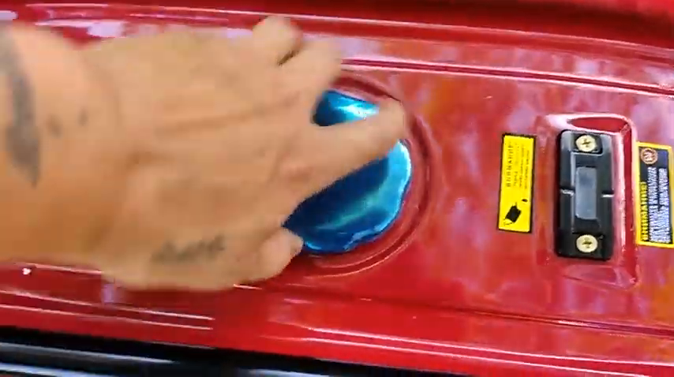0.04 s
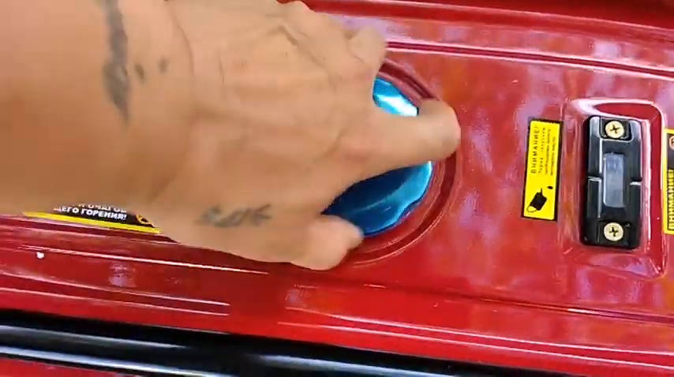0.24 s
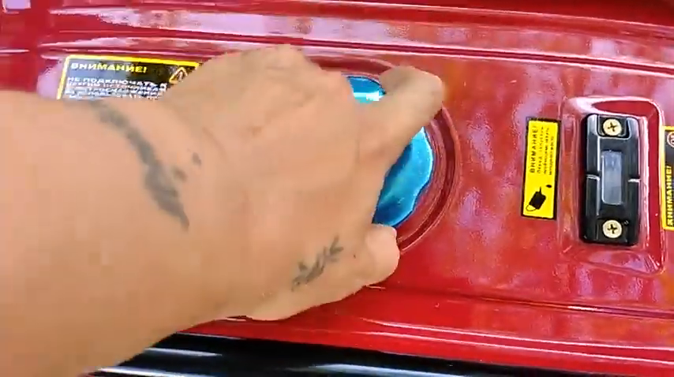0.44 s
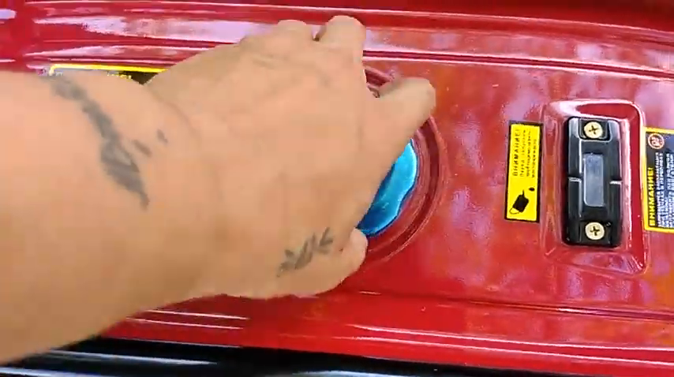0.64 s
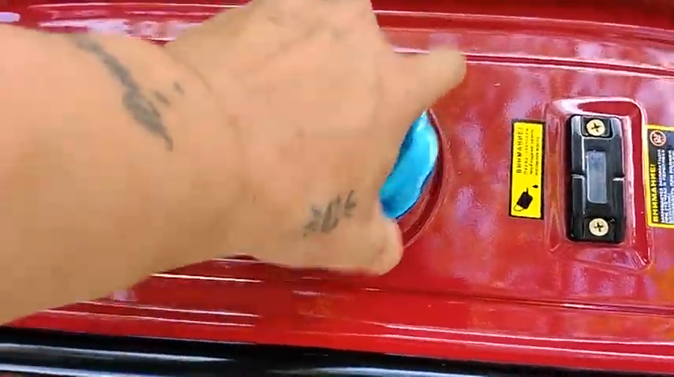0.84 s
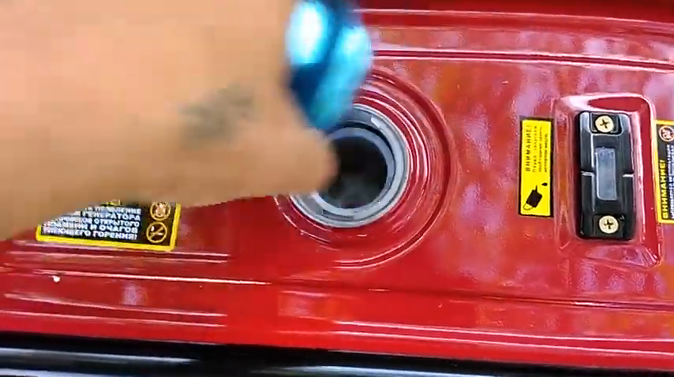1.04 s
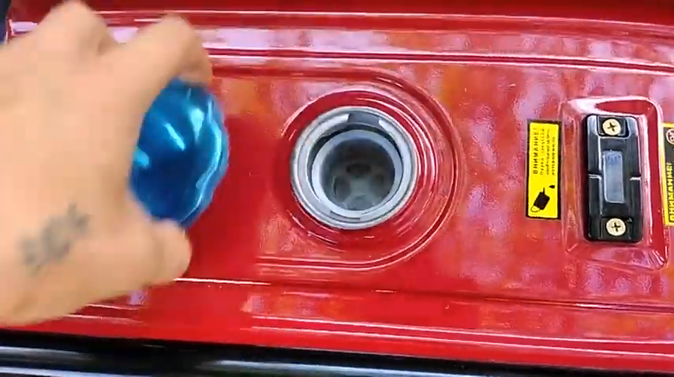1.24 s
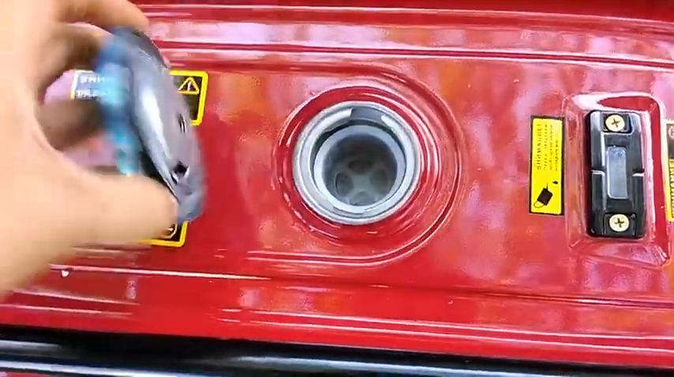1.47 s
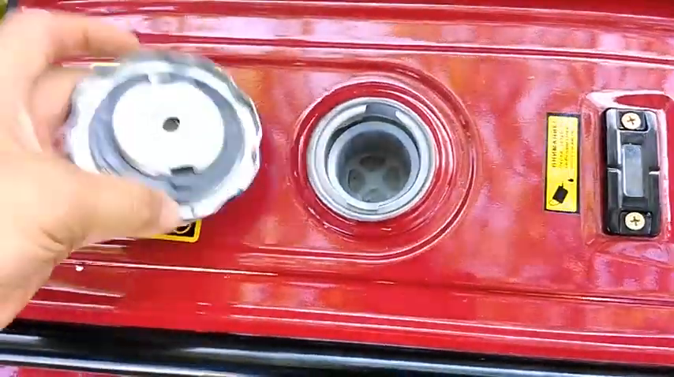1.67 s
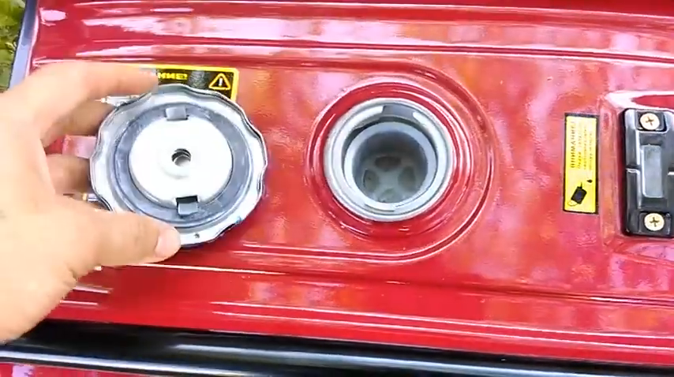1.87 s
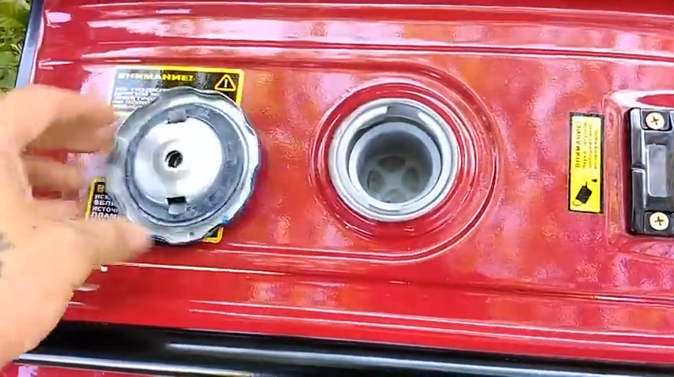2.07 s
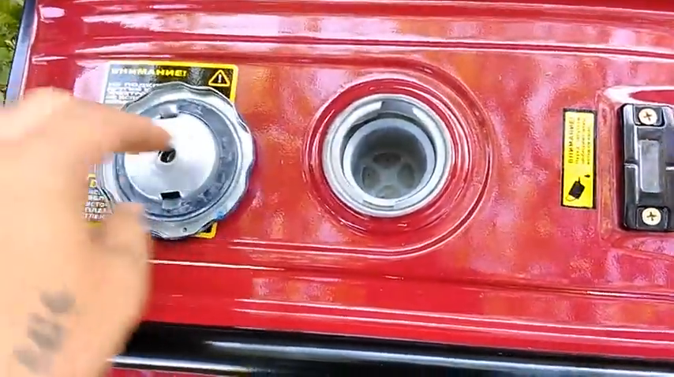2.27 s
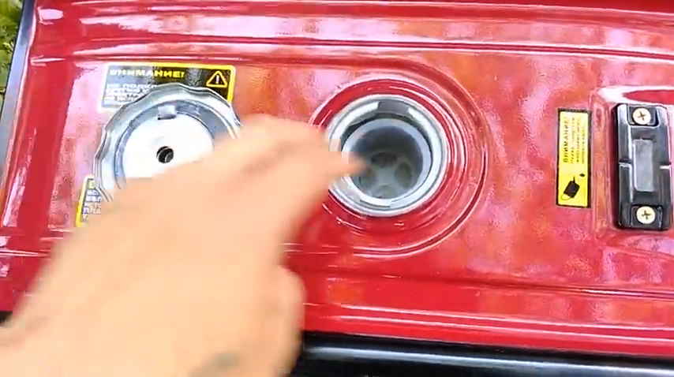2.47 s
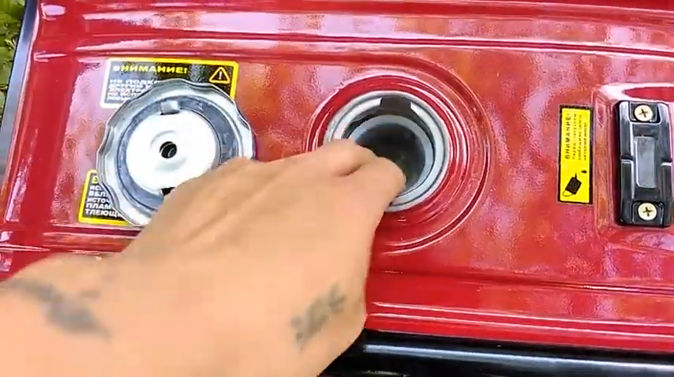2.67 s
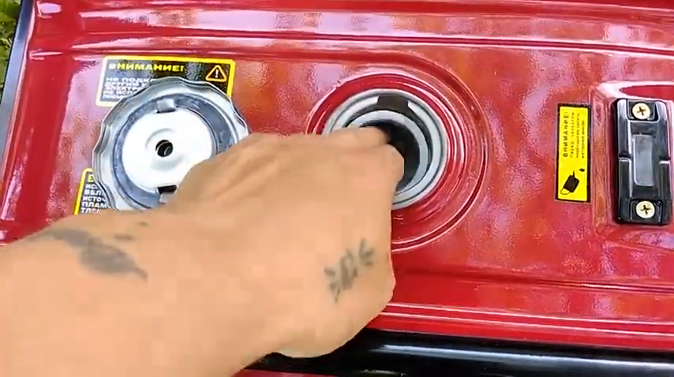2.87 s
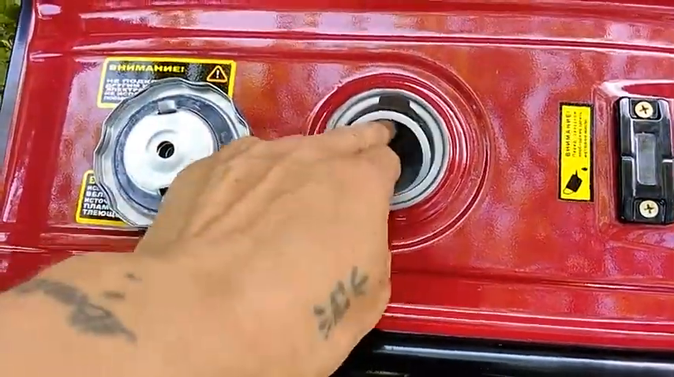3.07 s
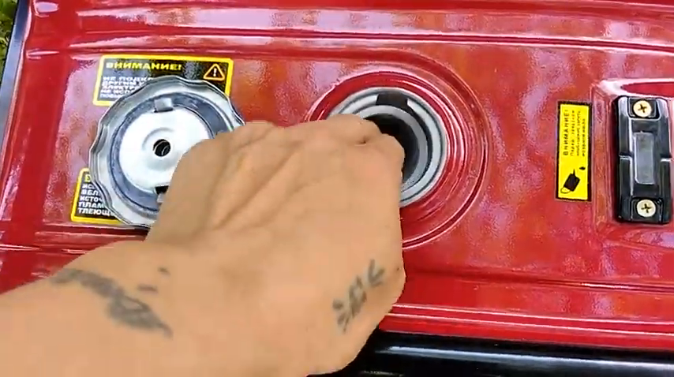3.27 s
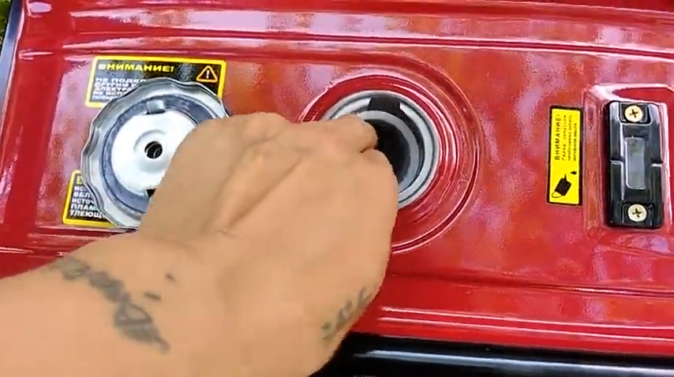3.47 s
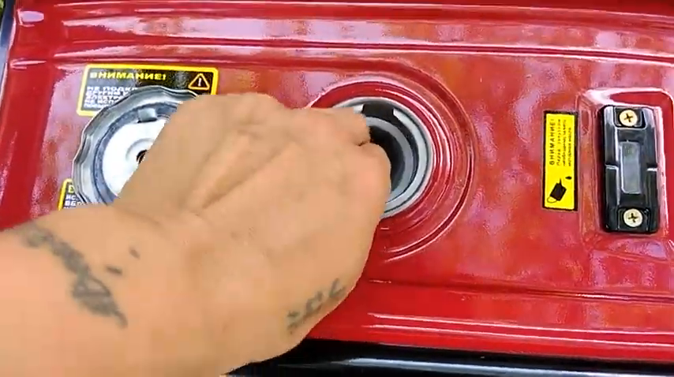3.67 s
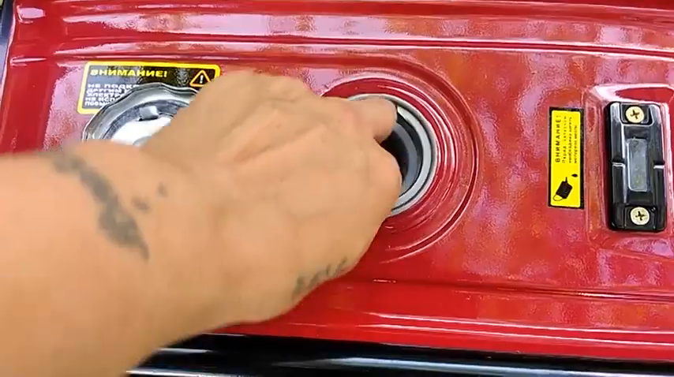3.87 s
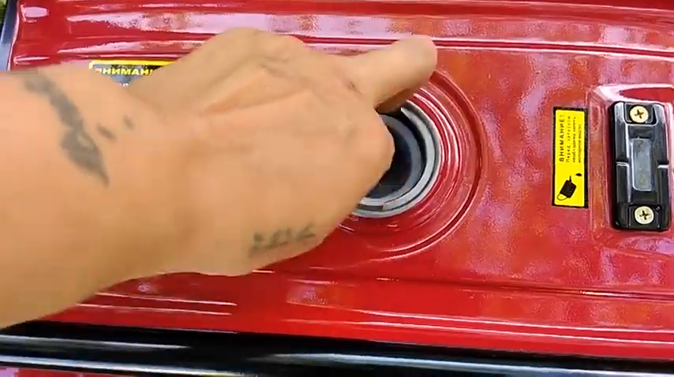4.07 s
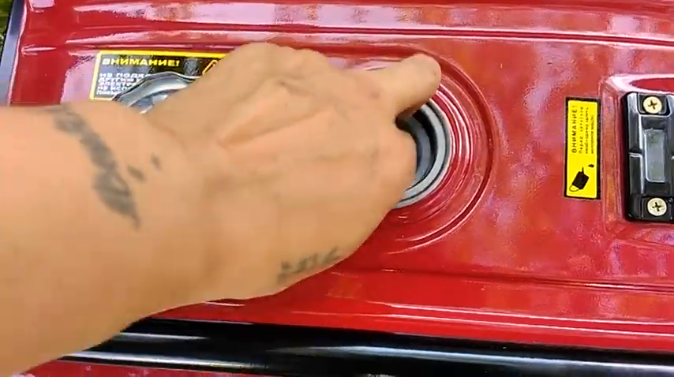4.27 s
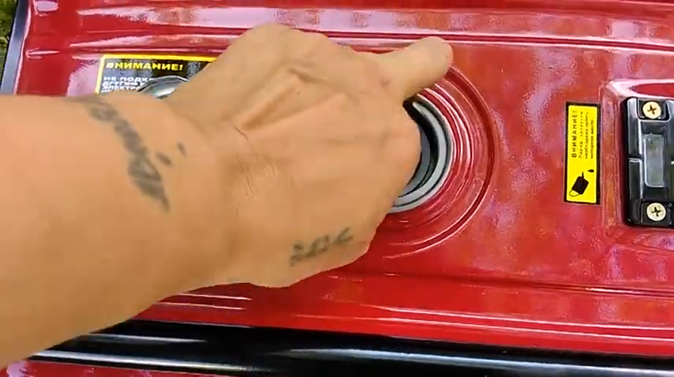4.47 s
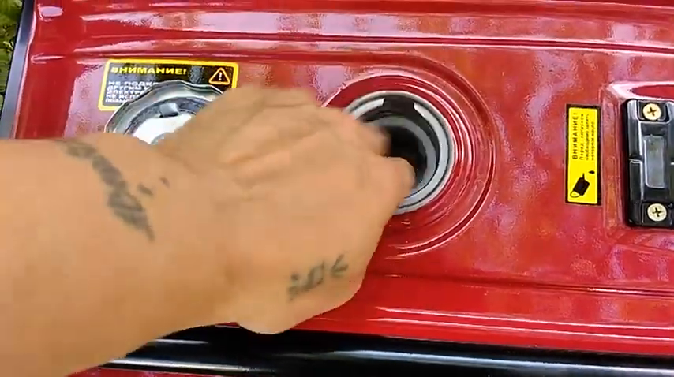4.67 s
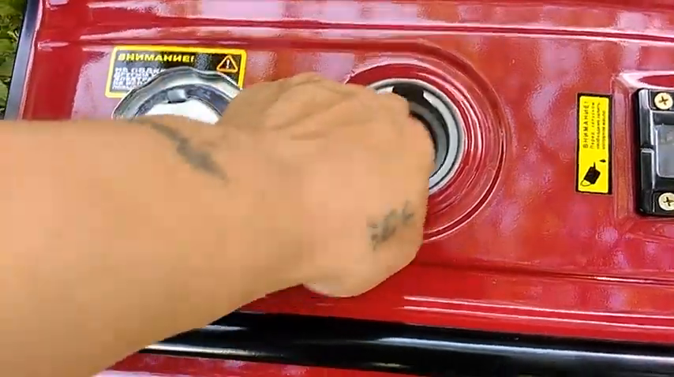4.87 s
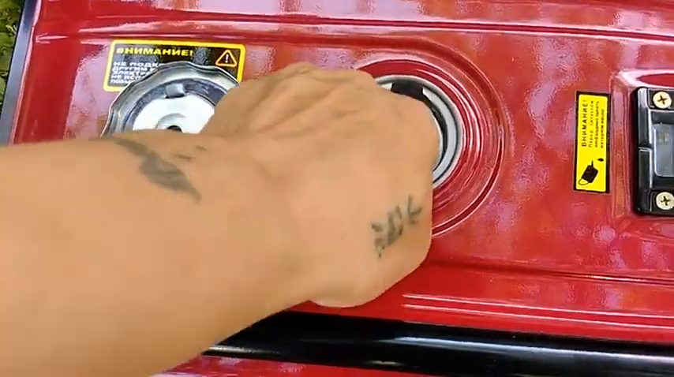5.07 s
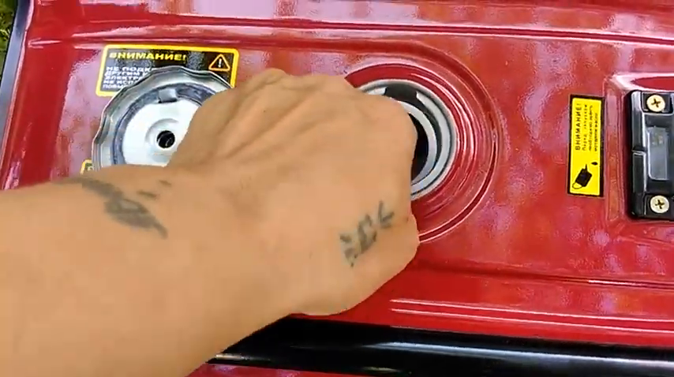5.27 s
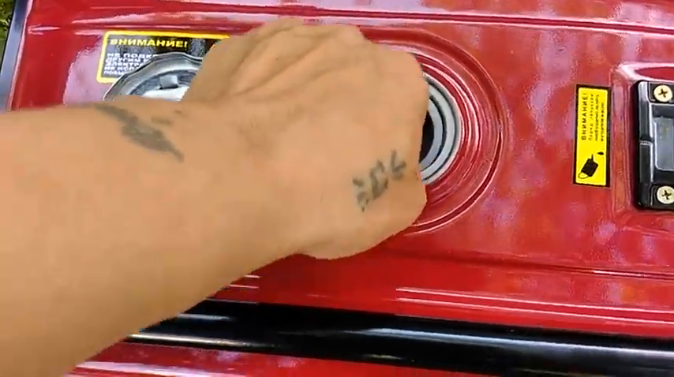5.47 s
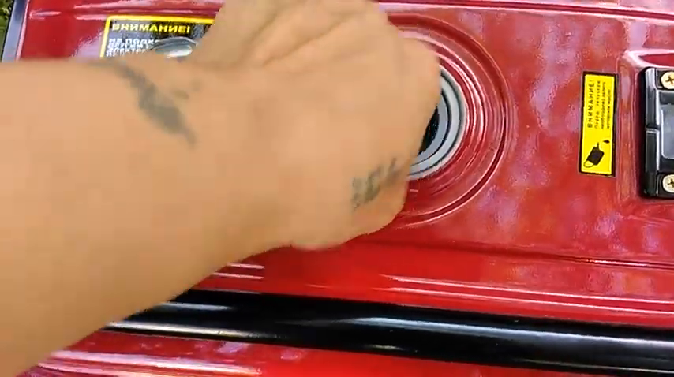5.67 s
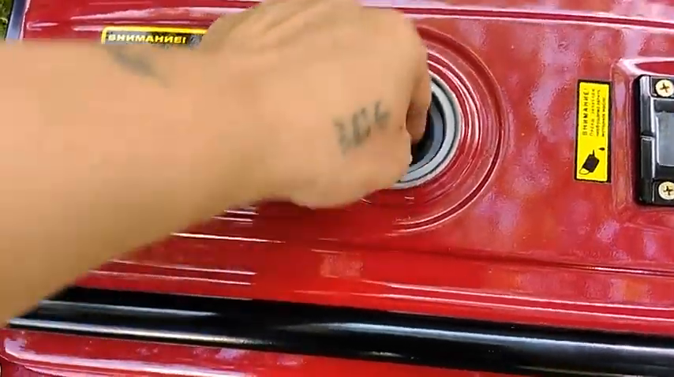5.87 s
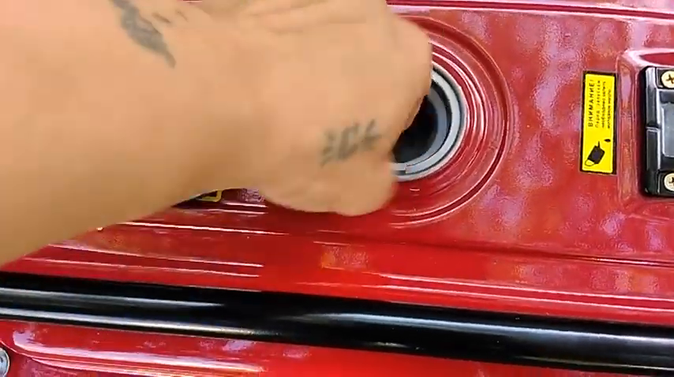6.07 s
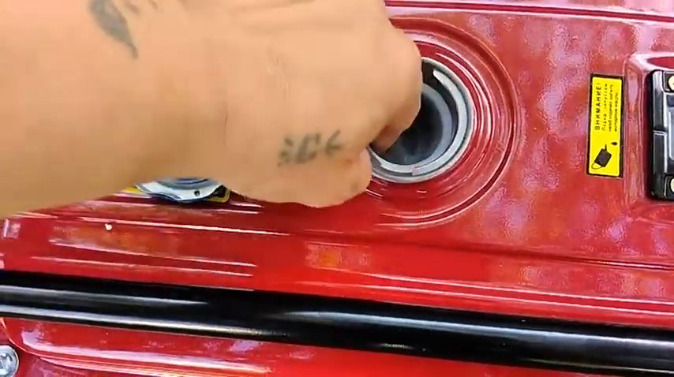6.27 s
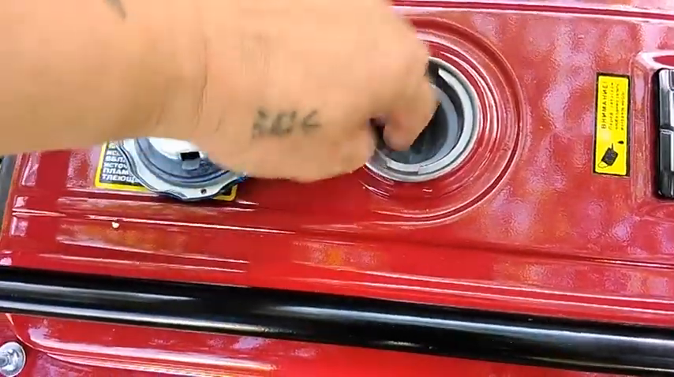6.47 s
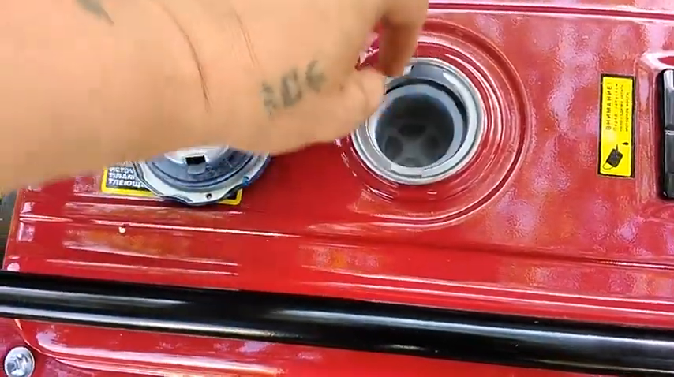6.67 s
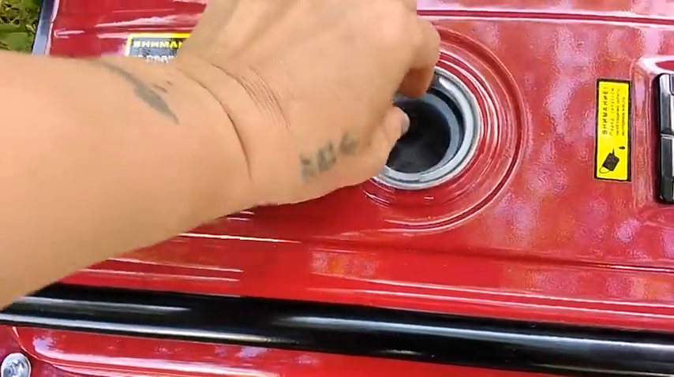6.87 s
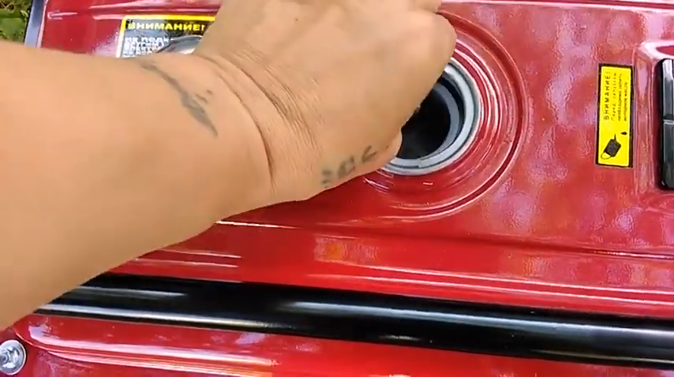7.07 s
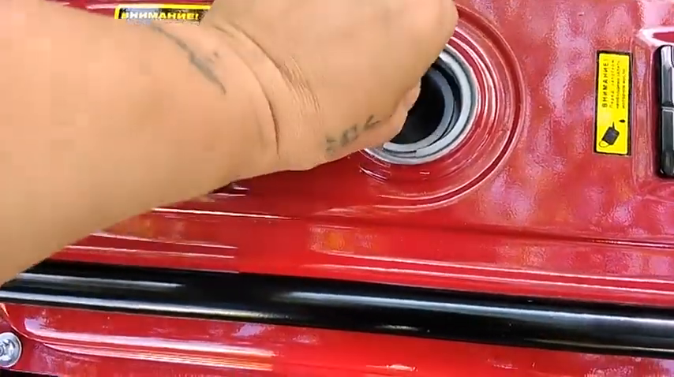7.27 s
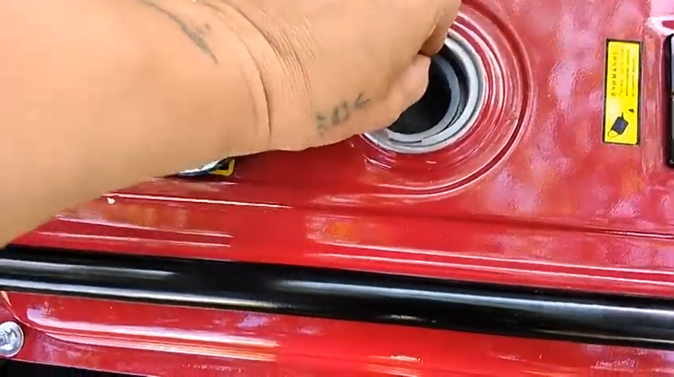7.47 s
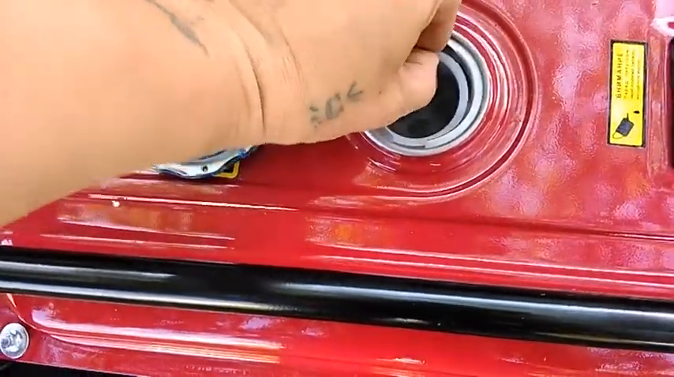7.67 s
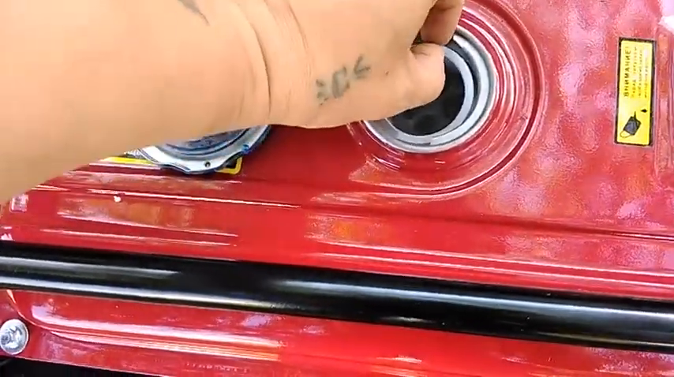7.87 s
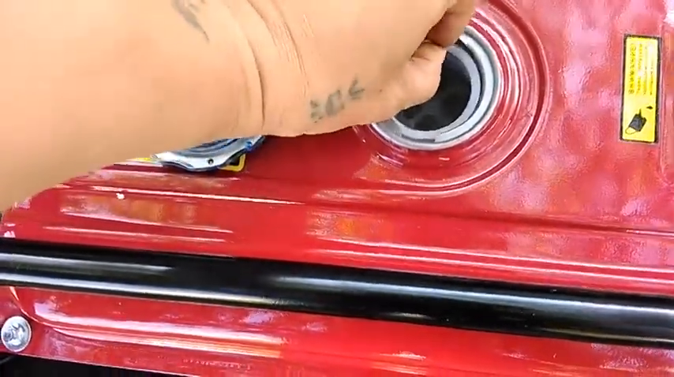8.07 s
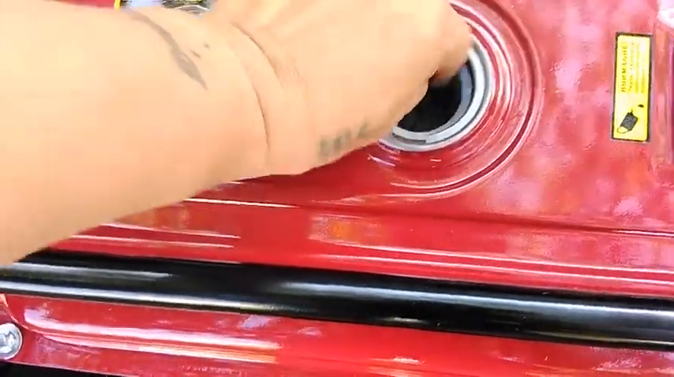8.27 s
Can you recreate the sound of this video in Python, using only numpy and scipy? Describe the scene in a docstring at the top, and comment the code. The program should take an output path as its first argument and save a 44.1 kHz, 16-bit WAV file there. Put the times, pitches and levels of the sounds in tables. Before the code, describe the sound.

Close metallic cap clicks, a small clink and two heavy hollow thuds, followed by irregular finger taps and rubbing on a sheet-metal tank outdoors.

```python
"""Outdoor quiet lies under a close take on a hollow sheet-steel tank. A cap's lugs scrape and snap out of the neck,
its loose locking plate clinks as it is turned over, then it lands on top and rocks to rest. Fingers rub and bump
the filler neck, and one faint insect swells toward the end. Knocks ring tank modes inside a crowd of weaker ones;
rubbing drives the same rings with random slips; air, skin hiss and insect are shaped noise."""
import sys
import numpy as np
from scipy import signal
from scipy.fft import rfft, irfft, next_fast_len
from scipy.io import wavfile
from scipy.ndimage import uniform_filter1d

SR = 44100
rng = np.random.default_rng(int(sys.argv[2]) if len(sys.argv) > 2 else 0)


def store_pcm(level_fs):
    """Save levels as 16-bit WAV."""
    pcm = np.round(np.clip(level_fs, -1, 1) * 32767).astype(np.int16)
    wavfile.write(sys.argv[1], SR, np.atleast_2d(pcm).T)


N = 367794
TIME = np.arange(N) / SR
RING = np.arange(int(0.6 * SR)) / SR  # time axis of one ring, s
ONSET = int(0.04 * SR)  # samples over which a ring's level is set


def amp(db):
    """Decibels to gain."""
    return 10 ** (np.asarray(db) / 20)


def evened(x, size=None):
    """Scales x so that its first size samples have rms 1."""
    return x / np.sqrt(np.mean(x[:size] ** 2) + 1e-20)


def decay(t60_s):
    """Exponential decay by 60 dB in t60_s."""
    return amp(-60 * RING / t60_s)


def ring_noise():
    """White noise as long as a ring."""
    return rng.standard_normal(len(RING))


def add(mix, start_s, sound):
    """Adds a sound to the mix from start_s on."""
    part = mix[max(round(start_s * SR), 0):][:len(sound)]
    part += sound[:len(part)]


def coloured(x, points, low_hz=10, high_hz=22000):
    """Gives x a spectrum of (Hz, dB) points between two soft band edges, at rms 1."""
    size = next_fast_len(len(x))
    hz = np.fft.rfftfreq(size, 1 / SR) + 1
    point_hz, point_db = np.transpose(points)
    band = 1 / np.sqrt((1 + (low_hz / hz) ** 16) * (1 + (hz / high_hz) ** 16))
    gain = amp(np.interp(np.log(hz), np.log(point_hz), point_db))
    return evened(irfft(rfft(x, size) * band * gain, size)[:len(x)])


def resonate(x, hz, width_hz):
    """A resonance that follows the curve hz: shift down to zero, smooth twice, shift back."""
    turn = np.exp(2j * np.pi * np.cumsum(hz) / SR)
    r = np.exp(-np.pi * width_hz / SR)
    smooth = signal.lfilter([1], [1, -2 * r, r * r], x / turn)
    return evened((turn * smooth).real)


def uneven(x, ripple_db, ripple_hz, lasts_s):
    """Narrow peaks and dips that come and go as the point of contact moves."""
    hz, t, z = signal.stft(x, SR, nperseg=512)
    field = rng.standard_normal(z.shape)
    for axis, span in enumerate((ripple_hz / hz[1], lasts_s / t[1])):
        size = max(round(span), 1)
        for _ in range(2):
            field = uniform_filter1d(field, size, axis, mode="wrap")
    gain = evened(amp(ripple_db * evened(field)))
    return signal.istft(z * gain, SR, nperseg=512)[1][:len(x)]


def wander(per_s):
    """Slow chance: a new random value per_s times a second, joined by straight lines."""
    return np.interp(TIME * per_s, np.arange(1000), rng.standard_normal(1000))


def grains(per_s, spread_db):
    """Tiny slips at random moments, a few much larger than the rest."""
    size = amp(spread_db * np.minimum(rng.exponential(1, N), 4))
    return evened(size * rng.choice([-1, 1], N) * (rng.random(N) < per_s / SR))


# Spectrum of still air. Each row: frequency in Hz, relative level in dB.
AIR_SPECTRUM = [(20, -26), (50, -3), (150, -4.5), (270, -7.5), (1000, -13.5), (3500, -15), (7300, -21.5),
                (8050, -15), (8900, -17), (15000, -27.5)]


def still_air(level_db=-87):
    """Quiet outdoor air: steady shaped noise."""
    return amp(level_db) * coloured(rng.standard_normal(N), AIR_SPECTRUM)


INSECT_REF_S, INSECT_REF_DB, INSECT_RISE_DB_PER_S = 8.4, -78, 12


def insect(chirr_hz=8050, skirt_hz=1300, pulse_hz=55.6, depth=0.28):
    """A faint insect: a narrow noise band that pulses and swells as it starts to sing."""
    spectrum = [(chirr_hz - skirt_hz, -36), (chirr_hz, 0), (chirr_hz + skirt_hz, -32)]
    chirr = coloured(rng.standard_normal(N), spectrum, low_hz=5020)
    pulses = evened(1 + depth * np.sin(2 * np.pi * pulse_hz * TIME))
    swell = amp(INSECT_REF_DB + INSECT_RISE_DB_PER_S * np.minimum(TIME - INSECT_REF_S, 0))
    return swell * chirr * pulses


# A fingertip or nail slips once. Each row: start in seconds, pitch in Hz, level in dB.
SLIP_TICKS = [(0.576, 4130, -63.5), (0.819, 5900, -48), (4.444, 5170, -64), (5.182, 3690, -73.5),
              (7.32, 1740, -69), (7.361, 1820, -65), (7.373, 1620, -71), (7.525, 2970, -70.5)]


def slip_ticks(t60_s=0.09, rise_s=0.00044, skirt_db=-34):
    """Single slips: short noise bursts in a narrow band around each tick's pitch."""
    out = np.zeros(N)
    for start_s, hz, db in SLIP_TICKS:
        spectrum = [(hz / 2, skirt_db), (hz, 0), (hz * 2, skirt_db)]
        burst = coloured(ring_noise(), spectrum, hz / 2, hz * 2)
        tick = burst * decay(t60_s) * (1 - np.exp(-RING / rise_s))
        add(out, start_s, amp(db) * evened(tick, ONSET))
    return out


# Modes of the locking plate. Each row: frequency in Hz, relative level in dB, t60 in seconds.
PLATE_MODES = [(782, -14.5, 0.122), (1512, -11.5, 0.11), (1700, -1, 0.12), (2240, -3.5, 0.16),
               (3630, -1, .11), (4200, -13.5, .12), (4800, -2, 0.044), (4760, -11, .07), (5780, 1.5, .07),
               (5870, -4, 0.098), (6100, -3.5, .07), (6650, -8, .08), (7100, -7, 0.049), (8480, -4.5, .05),
               (9350, -11, .06), (12840, -20, .05), (13640, -17.5, .04)]


def plate_ring(spot_db=1.5):
    """The small steel plate's dying sines, weighted by the spot that is hit."""
    hz, db, t60_s = np.transpose(PLATE_MODES)[:, :, None]
    weights = rng.choice([-1, 1], len(hz)) * amp(spot_db * rng.standard_normal(len(hz)))
    modes = amp(db) * decay(t60_s) * np.sin(2 * np.pi * hz * RING)
    return evened(weights @ modes, ONSET)


# Skin sliding on paint; also colours the plate's tick. Each row: frequency in Hz, relative level in dB.
SKIN_SPECTRUM = [(1200, -15), (3000, 0), (4800, -8), (5700, -4.5), (6600, -0.5), (8200, 1.5), (9300, -4.5),
                 (10200, -13), (13000, -20), (15500, -23)]
# The loose locking plate hits as the cap is turned over. Each row: start in seconds, level in dB.
CLINKS = [(1.588, -63.5), (1.604, -47.5), (1.649, -55)]
# The plate slides fastest just before it hits its stop.
SLIDE_PEAK_S, SLIDE_DB, SLIDE_RISE_DB_PER_S, SLIDE_FALL_DB_PER_S = 1.586, -62, 193, 151


def clinks(tick_db=-1, tick_t60_s=0.046):
    """The locking plate slides, singing faintly, and hits its stops with a sharp tick."""
    ring = plate_ring()
    since_s = TIME - SLIDE_PEAK_S
    speed = amp(SLIDE_DB + np.minimum(SLIDE_RISE_DB_PER_S * since_s, -SLIDE_FALL_DB_PER_S * since_s))
    slide = speed * grains(per_s=3700, spread_db=8.5)
    singing = signal.oaconvolve(slide, ring / np.linalg.norm(ring))[:N]
    out = uneven(singing, ripple_db=5.5, ripple_hz=299, lasts_s=0.025)
    for start_s, db in CLINKS:
        tick = coloured(ring_noise(), SKIN_SPECTRUM, low_hz=3720) * decay(tick_t60_s)
        clink = plate_ring() + amp(tick_db) * evened(tick, ONSET)
        add(out, start_s, amp(db) * evened(clink, ONSET))
    return out


# Registers of the tank: boom, body, clang, click. Each row: low edge in Hz, high edge in Hz, first t60 in seconds,
# late t60 in seconds, late share in dB, base level of the crowd of weak modes in dB.
REGISTERS = [(51.3, 200, 0.088, 0.6, -18, -5.5), (180, 950, 0.13, 0.45, -2, -7),
             (966, 3030, 0.16, 0.46, -9.5, 3.5), (2947.6, 26000, 0.028, 0.25, -9.5, 0)]
# Tank modes. Each row: frequency in Hz, relative level under a finger in dB, under the cap in dB, t60 in seconds.
TANK_MODES = [(70.7, -7.5, -14.5, 0.44), (117.2, -5, -4, 0.39), (154.5, 0.5, -7.5, 0.36),
              (221, -8, -3, 0.36), (261.7, 0.5, 0.5, 0.36), (269.6, 1.5, -2, 0.24),
              (311.5, -0.5, -9.5, 0.4), (396, -19.5, -8, 0.44), (480.4, -8, -50, 0.34),
              (509.5, -6, -27, 0.27), (600.5, -12, -4.5, 0.31), (631.4, -6, -6, 0.23),
              (709, -5.5, -17, 0.45), (732, -3.5, -12, 0.3), (759, -5.5, -25, 0.3),
              (838, -30.5, -24.5, 0.12), (861, -11.5, -14, 0.42), (894, -17.5, -15.5, 0.29),
              (958, -28, -16, 0.36), (1053, -31.5, -16, 0.68), (1171, -32, -8.5, 0.19),
              (1230, -12.5, -28, 0.21), (1321, -13.5, -14, 0.11), (1399, -19.5, -17.5, 0.46),
              (1460, -11, -37, 0.067), (1625, -22, -35.5, 0.24), (1684, -27.5, -23.5, 0.56),
              (1784, -27, -26.5, 0.38), (2943.8, -32, -22, 0.36)]


def mode_shapes(by_cap):
    """The tank's dying sines under the cap or under a finger, grouped by register."""
    hz, finger_db, cap_db, t60_s = np.transpose(TANK_MODES)[:, :, None]
    waves = amp(cap_db if by_cap else finger_db) * decay(t60_s) * np.sin(2 * np.pi * hz * RING)
    return [waves[(hz[:, 0] >= low) & (hz[:, 0] < high)] for low, high, *_ in REGISTERS]


# Spectrum of the crowd of weak modes. Each row: frequency in Hz, relative level in dB.
STEEL_SPECTRUM = [(60, -2), (300, -1.5), (800, 0), (1050, -5.5), (1400, -3), (1850, -7), (2400, -13.5),
                  (3100, -15.5), (4800, -16.5), (7000, -14.5), (9000, -22), (11000, -28), (13500, -32),
                  (15500, -32.5)]


def tank_ring(waves, register, dense_db, tilt_db_per_octave=0, spot_db=4.5, ripple_db=5.0):
    """One register's answer to a tap: strong modes in a crowd of weak ones, weighted by the spot hit."""
    low_hz, high_hz, first_t60_s, late_t60_s, late_db, crowd_db = register
    weights = amp(spot_db * rng.standard_normal(len(waves))) * rng.choice([-1, 1], len(waves))
    hz = np.geomspace(40, 16000, 220)
    steel_hz, steel_db = np.transpose(STEEL_SPECTRUM)
    db = np.interp(np.log(hz), np.log(steel_hz), steel_db) + ripple_db * rng.standard_normal(len(hz))
    db += tilt_db_per_octave * np.log2(np.clip(hz, 3000, 7000) / 3000)
    crowd = coloured(ring_noise(), np.c_[hz, db], low_hz, high_hz) * decay(late_t60_s)
    ring = evened(weights @ waves, ONSET) + amp(crowd_db + dense_db) * evened(crowd, ONSET)
    # the struck spot is loudest at first, until the motion has spread over the shell
    extra_decay = amp(-60 * RING * max(1 / first_t60_s - 1 / late_t60_s, 0))
    return ring * (extra_decay + amp(late_db))


# The cap or the skin slides over the tank. Each row: start in seconds, length in seconds, then relative levels of
# low shudder in dB, drag on the steel in dB, hiss in dB.
STROKES = [(0.0, 0.071, -61.5, -79, -70.5), (0.213, 0.11, -67, -72, -62), (0.42, 0.19, -60, -91, -65.5),
           (0.687, .22, -49, -49, -74), (1.414, 0.045, -78.5, -88, -75.5), (1.538, 0.083, -92, -83, -61.5),
           (1.673, 0.4, -80, -70, -73.5), (2.122, 0.19, -48.5, -47, -70.5), (2.373, 0.082, -51, -66.5, -89),
           (2.655, 0.11, -75, -89.5, -64.5), (2.777, 0.079, -82, -64, -73.5),
           (2.892, .16, -52.5, -51.5, -66.5), (3.196, 0.071, -74, -49, -67),
           (3.535, 0.073, -66.5, -62, -83.5), (3.795, 0.066, -44, -60, -62.5),
           (3.905, 0.3, -57, -65.5, -72.5), (4.147, .17, -56, -53.5, -70.5), (4.344, 0.11, -56, -56.5, -94),
           (4.422, 0.061, -51, -58, -65), (4.483, 0.084, -50, -42, -62.5), (4.635, 0.12, -60, -44, -63),
           (4.866, 0.14, -63, -56.5, -76), (5.001, 0.12, -55, -54.5, -65.5),
           (5.811, 0.078, -61, -48.5, -66), (5.945, 0.048, -57, -56, -62), (6.057, .11, -55.5, -56, -65.5),
           (6.207, 0.27, -61, -61.5, -94), (6.506, 0.087, -67.5, -63, -70.5),
           (6.585, 0.074, -59, -52.5, -60), (6.704, 0.083, -53, -46, -79),
           (6.901, 0.092, -56.5, -69.5, -70), (7.094, 0.18, -53.5, -58, -67), (7.263, 0.49, -75, -62, -97),
           (7.597, 0.074, -46, -54.5, -68.5), (7.937, 0.066, -74, -72.5, -99),
           (8.219, 0.14, -50, -53.5, -72.5)]
STROKE_ATTACK_S = 0.014
SHUDDER_RELEASE_S, DRAG_RELEASE_S, HISS_RELEASE_S = 0.058, 0.031, 0.038


def stroke_forces():
    """Shudder, drag and hiss of all strokes: each rises quickly, holds, and dies away."""
    powers, t = np.zeros((3, N)), TIME[:SR]
    releases_s = (SHUDDER_RELEASE_S, DRAG_RELEASE_S, HISS_RELEASE_S)
    for start_s, length_s, *levels_db in STROKES:
        for power, db, release_s in zip(powers, levels_db, releases_s):
            envelope = np.minimum(t / STROKE_ATTACK_S, 1) * np.exp(-np.maximum(t - length_s, 0) / release_s)
            add(power, start_s, (amp(db) * envelope) ** 2)
    return np.sqrt(powers)


def catching(depth_db, per_s):
    """Friction grips and lets go at random, so the slips come in clumps."""
    return evened(amp(depth_db * wander(per_s)))


def skin_hiss(force, hiss_db=-3.0, swish_db=-2.5, swish_hz=6940, swish_wander=0.09, turns_per_s=9):
    """Skin on paint hisses without ringing; its swish wanders slowly and at random in pitch."""
    ridges = grains(per_s=8000, spread_db=6.0)  # of a fingertip
    swish = resonate(ridges, swish_hz * (1 + swish_wander * wander(turns_per_s)), width_hz=3000)
    hiss = coloured(grains(per_s=6000, spread_db=2.5), SKIN_SPECTRUM, low_hz=900)
    return force * (amp(hiss_db) * hiss + amp(swish_db) * swish)


CAP_STILL_S = 2.62  # strokes ring the tank as under the cap before this, as under a finger after


def rubbing(clang_db=-6, clang_follows_hiss=0.27):
    """Stick and slip shakes the tank, first under the cap, then under the fingers, with skin hiss."""
    shudder, drag, hiss = stroke_forces()
    clang = drag ** (1 - clang_follows_hiss) * hiss ** clang_follows_hiss * amp(clang_db)
    slips = grains(per_s=900, spread_db=3.5) * catching(depth_db=0.5, per_s=45)
    out = skin_hiss(hiss)
    for by_cap in (True, False):
        touching = (TIME < CAP_STILL_S) == by_cap
        # three forces drive boom, body and clang; the click register stays silent
        for force, waves, register in zip((shudder, drag, clang), mode_shapes(by_cap), REGISTERS):
            ring = tank_ring(waves, register, dense_db=2 if by_cap else -4, spot_db=2.5, ripple_db=0.5)
            out += signal.oaconvolve(slips * force * touching, ring / np.linalg.norm(ring))[:N]
    return uneven(out, ripple_db=3.5, ripple_hz=260, lasts_s=0.054)


def knocks(rows, by_cap, dense_db, tilt_db_per_octave, clang_db, clang_follows_click, bass_lag_s=0.0022):
    """Blows on the tank: clang is set from body and click, soft contacts swell slowly, bass builds last."""
    out, shapes = np.zeros(N), mode_shapes(by_cap)
    for start_s, contact_s, boom_db, body_db, click_db in rows:
        row_clang_db = body_db + clang_db + clang_follows_click * (click_db - body_db)
        levels_db = (boom_db, body_db, row_clang_db, click_db)
        for waves, register, db in zip(shapes, REGISTERS, levels_db):
            rise_s = contact_s + bass_lag_s * REGISTERS[0][0] / register[0]
            ring = tank_ring(waves, register, dense_db, tilt_db_per_octave) * (1 - np.exp(-RING / rise_s))
            add(out, start_s, amp(db) * evened(ring, ONSET))
    return out


# Fingers and nails bump the open neck. Each row: start in seconds, contact time in seconds, boom in dB,
# body in dB, click in dB.
FINGER_KNOCKS = [(2.757, 0.0018, -85, -58, -87), (2.884, 0.0017, -55, -57, -67),
                 (2.955, 0.0018, -46, -46, -60.5), (3.193, .002, -60, -51, -71.5),
                 (3.2415, 0.0014, -58.5, -42.5, -65), (3.483, 0.0062, -58, -72, -86),
                 (3.521, .002, -49.5, -55, -81), (3.765, 0.0057, -59, -51.5, -86),
                 (3.812, 0.016, -43.5, -52.5, -62), (4.025, 0.013, -49.5, -69, -67),
                 (4.127, 0.0048, -49.5, -55, -62.5), (4.171, 0.0093, -53, -46.5, -61.5),
                 (4.252, 0.0014, -54, -46, -73), (4.319, 0.00079, -46, -47, -81),
                 (4.4905, .0012, -46.5, -40.5, -59), (4.669, 0.0029, -46, -43, -46.5),
                 (4.727, 0.0067, -46, -43.5, -48.5), (4.745, 0.0015, -42.5, -34, -60),
                 (4.883, 0.0044, -49, -49.5, -83), (4.984, 0.0015, -51.5, -58, -84),
                 (5.041, 0.003, -48.5, -48, -57.5), (5.273, 0.00086, -62, -57, -78),
                 (5.406, 0.0032, -46, -45.5, -56.5), (5.835, 0.0031, -57.5, -45.5, -63.5),
                 (5.88, 0.0061, -48, -61, -91), (5.955, 0.0038, -55, -47, -73.5),
                 (6.153, 0.0036, -67, -51.5, -69.5), (6.324, 0.0018, -50, -61, -87),
                 (6.367, 0.0074, -46, -52, -81.5), (6.575, 0.0043, -42, -55.5, -59.5),
                 (6.611, 0.0053, -39.5, -37, -50.5), (6.665, 0.0065, -50, -41, -77),
                 (6.777, 0.012, -41.5, -59, -58.5), (7.067, .003, -75, -59, -56),
                 (7.1, .0022, -49.5, -82, -82), (7.16, 0.0015, -46, -49.5, -64),
                 (7.207, 0.0065, -60, -52, -62), (7.32, 0.0011, -73, -50.5, -92),
                 (7.361, 0.00047, -66, -48, -83), (7.486, 0.012, -81, -54.5, -86),
                 (7.527, 0.0029, -66.5, -50.5, -79), (7.623, .012, -46, -52.5, -72),
                 (7.65, 0.002, -43, -53, -61.5), (7.857, 0.002, -58.5, -82, -96),
                 (8.006, 0.0021, -53, -52.5, -55), (8.173, 0.011, -50, -61, -73),
                 (8.237, 0.00087, -64, -48, -66.5), (8.325, 0.0044, -69, -56, -63)]


def finger_knocks():
    """Bumps of fingers and nails, ringing the tank's modes as a finger excites them."""
    return knocks(FINGER_KNOCKS, False, dense_db=-3.5, tilt_db_per_octave=-0.5,
                  clang_db=-3.5, clang_follows_click=0.43)


# The cap's lugs scrape and snap out of the neck, then the cap lands on top and rocks. Each row: start in seconds,
# contact time in seconds, boom in dB, body in dB, click in dB.
CAP_KNOCKS = [(0.093, 0.006, -51.5, -63.5, -77), (0.202, .018, -64, -56.5, -58.5),
              (0.3217, 0.00049, -48, -37, -38.5), (0.596, 0.0019, -50.5, -60, -84),
              (0.668, 0.0015, -60, -48.5, -67.5), (0.692, 0.0004, -47, -44, -55),
              (0.735, .0009, -40, -54, -59.5), (0.747, 0.0021, -34.5, -39.5, -48.5),
              (0.765, .0012, -42, -41, -51.5), (0.806, 0.0013, -36.5, -42, -50.5),
              (0.821, 0.002, -59, -41.5, -59), (1.758, 0.0041, -36, -30, -48.5),
              (2.093, 0.0014, -34.5, -30.5, -43.5), (2.111, 0.0094, -59, -37, -53),
              (2.152, 0.0023, -36.5, -32.5, -57), (2.218, .0008, -42, -42, -57.5),
              (2.243, 0.0021, -45, -42.5, -64), (2.268, 0.0026, -41.5, -47, -66.5),
              (2.296, 0.0056, -45, -47, -67.5), (2.345, 0.0058, -46, -64, -82)]


def cap_knocks():
    """Blows of the cap, ringing the tank's modes as the cap excites them."""
    return knocks(CAP_KNOCKS, True, dense_db=2.5, tilt_db_per_octave=-5.0,
                  clang_db=-1.33, clang_follows_click=0.42)


def scene():
    """All contacts with the tank and the cap, over the outdoor quiet."""
    background = still_air() + insect()
    contacts = slip_ticks() + clinks() + rubbing() + finger_knocks() + cap_knocks()
    return (background + contacts)[None]


def record(dry, low_cut_hz=54, edge_hz=15800):
    """The microphone's bass roll-off and the band limit."""
    thinned = signal.sosfilt(signal.butter(3, low_cut_hz, "high", fs=SR, output="sos"), dry)
    band_limit = signal.firwin(511, edge_hz, window=("kaiser", 9), fs=SR)
    return signal.oaconvolve(thinned, band_limit[None], "same")


dry = scene()
out = record(dry)
store_pcm(out)
```